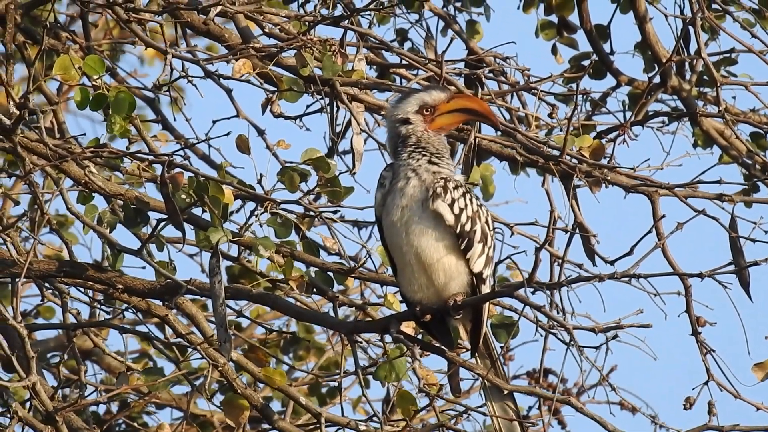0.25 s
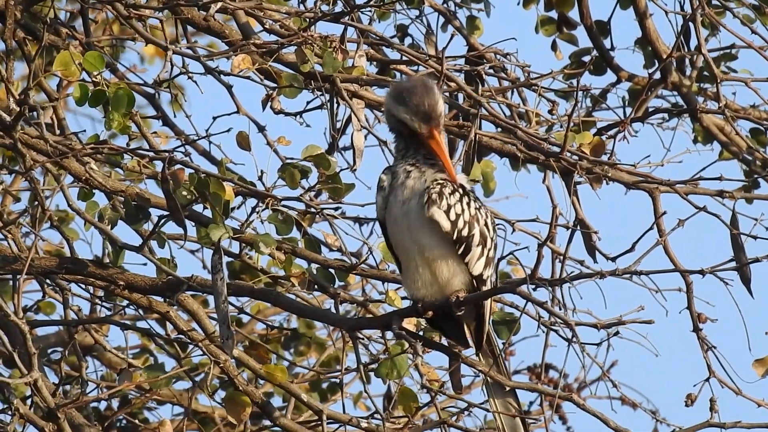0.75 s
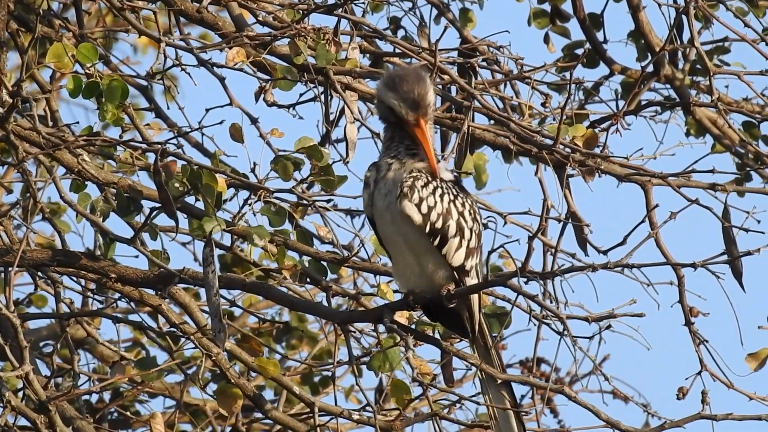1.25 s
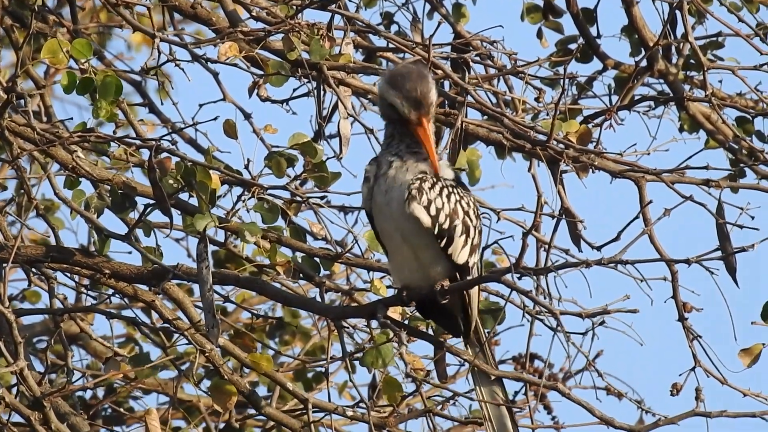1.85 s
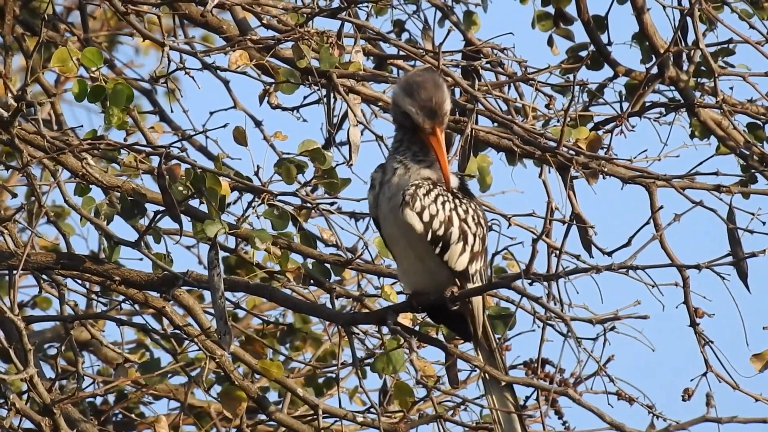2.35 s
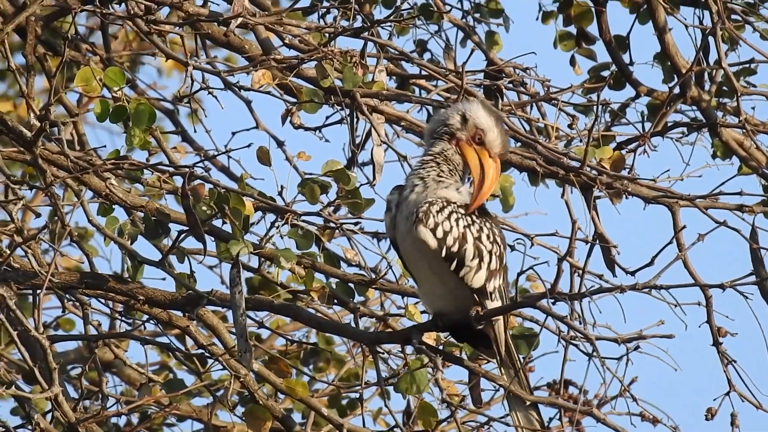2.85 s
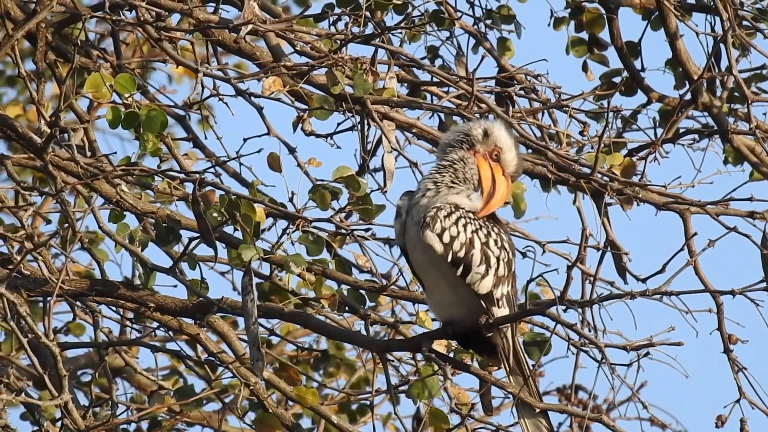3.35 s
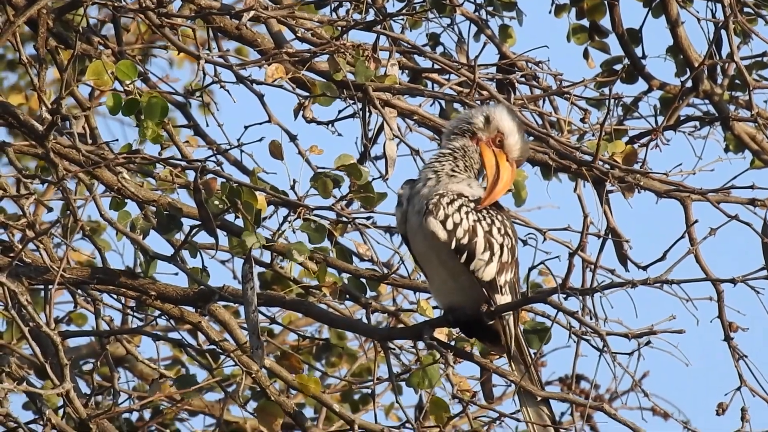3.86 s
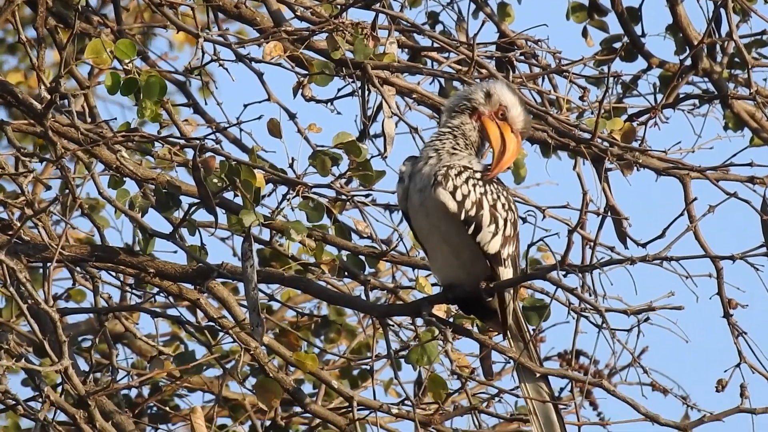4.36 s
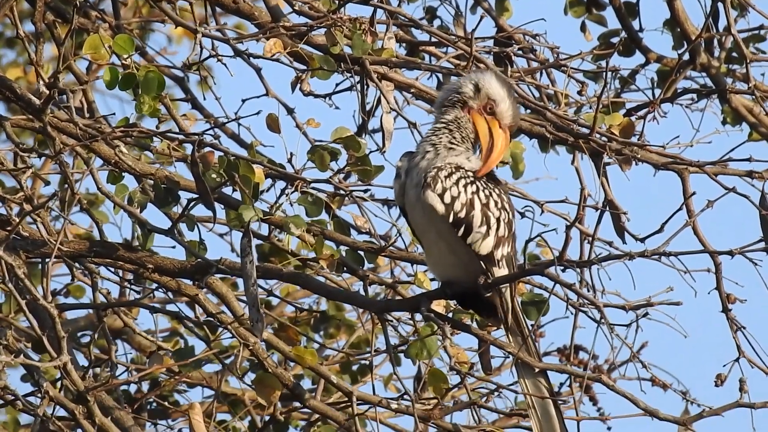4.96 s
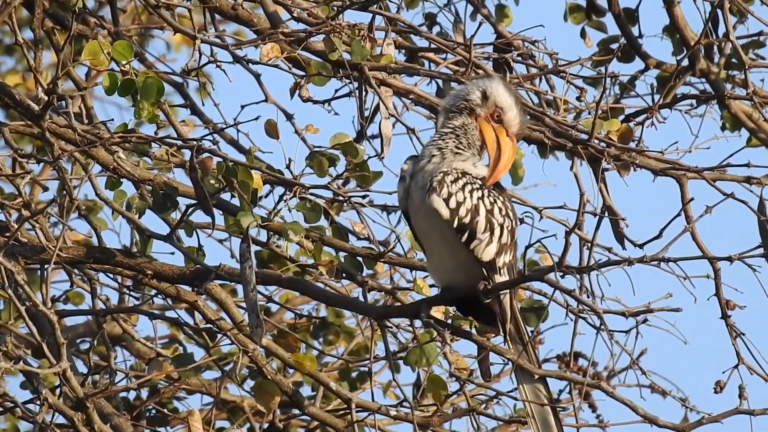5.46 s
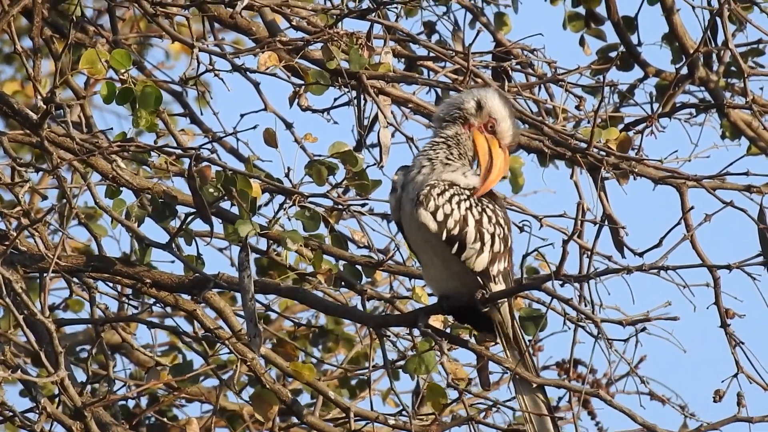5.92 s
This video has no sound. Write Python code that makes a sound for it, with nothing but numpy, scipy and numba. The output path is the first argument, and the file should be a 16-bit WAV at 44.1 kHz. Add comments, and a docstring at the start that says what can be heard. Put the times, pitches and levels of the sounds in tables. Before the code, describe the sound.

A hornbill repeats short falling calls outdoors over low rumble and hiss, with a distant dove cooing and one sharp click.

```python
"""From the start, over a stereo microphone's rumble and hiss, a hornbill in a thorn tree repeats a short
falling 'wok' about five times a second: harmonics shaped by its throat, echoed by branches, trunks and
ground, and rounded off by the microphone when loudest. From 0.5 s leaves rustle and small birds chirp
faintly, as narrow bands of noise. At 1.4 s a distant dove begins to repeat a nearly pure three-note
phrase, its long note modulated into a roll. At 3.7 s something gives one sharp click; the birds call on."""
import sys
import numpy as np
from scipy import signal
from scipy.fft import rfft, irfft
from scipy.io import wavfile
from numba import njit

SR = 44100
rng = np.random.default_rng(int(sys.argv[2]) if len(sys.argv) > 2 else 0)


def to_wav(sig):
    """Store sig (one row per channel, or 1-D mono) as 16-bit WAV at the path in sys.argv[1].

    Samples outside -1..1 are clipped; the rate is SR.
    """
    pcm = np.clip(np.atleast_2d(sig), -1, 1) * 32767
    pcm = np.round(pcm).astype(np.int16)
    wavfile.write(sys.argv[1], SR, pcm.T)  # frames by channels


N = 272979

# hornbill calls: (time of peak [s], vocal effort [dB])
CALLS = [(0.1109, -0.3), (.2723, -3), (.472, -0.3), (0.671, 1), (.868, 0.2), (1.0757, -1), (1.2773, -1.7),
         (1.4439, 0.34), (1.6553, 1.5), (1.8643, -0.8), (2.0329, 1.6), (2.2289, 2), (2.3908, 0.95),
         (2.5664, 3.5), (2.7533, 1.5), (2.9142, 4), (3.098, 2.7), (3.3757, 5), (3.5569, 5), (3.7841, 4),
         (3.9699, 3), (4.157, 2.5), (4.4236, 0.0867), (4.8041, 2), (5.0351, 0.86), (5.251, 0.9),
         (5.4526, 2.5), (5.6395, 2.5), (5.8361, 4), (6.0266, 3), (6.1896, 1.5)]
# course of a call: (position [0-1], pitch [ratio], first partial [gain], second partial [gain])
CALL_CONTOUR = [(0, 1.386, 0.033, 0.0092), (.098, 1.33, 0.032, 0), (0.17, 1.225, 0.15, 0.012),
                (0.26, 1.018, 0.068, .2), (0.431, 1.018, .15, 0.42), (0.622, 0.978, .11, 0.32),
                (0.73, 0.937, 0.086, 0.36), (.866, 0.804, 0.04, 0.13), (1, 0.714, 0.0064, 0.081)]
# throat response for the upper partials: (frequency [Hz], level re first partial [dB])
THROAT_RESPONSE = [(1200, 11.5), (1380, -31), (1600, -19.5), (1900, -49), (2200, -21), (2600, -37.5),
                   (3400, -30)]


def hornbill(base_hz=521.15, sharp_hz=15.1, settle_s=0.6, hz_per_db=3, spread_hz=2.52, jitter=0.0092):
    """Source and filter: the throat favours the second harmonic of a voice that drops, holds and drops."""
    out = np.zeros(N)
    position, pitch_ratios, *partial_gains = np.transpose(CALL_CONTOUR)
    for peak_s, effort_db in CALLS:
        # the first calls are a little sharp; effort also raises the pitch
        call_hz = base_hz + sharp_hz * np.exp(-peak_s / settle_s) + hz_per_db * effort_db
        call_hz += spread_hz * rng.standard_normal()
        # only the hardest calls are drawn out and hold their pitch longer
        strain = np.exp((effort_db - 5.5) / 1.15)
        length_s = 0.0373 + 0.0097 * strain
        progress = np.linspace(0, 1, int(length_s * SR))
        bend = np.interp(progress - 0.14 * strain * progress ** 3, position, pitch_ratios)
        pitch_hz = call_hz * bend * (1 + jitter * wander(398, len(progress)))
        phase = 2 * np.pi * np.cumsum(pitch_hz) / SR
        first, second = (np.interp(progress, position, gain) for gain in partial_gains)
        tone = first * np.sin(phase) + second * np.sin(2 * phase + np.pi / 4)
        # the third partial slides into the throat resonance as the call ends
        for k in range(3, 7):
            throat = undb(np.interp(k * pitch_hz, *np.transpose(THROAT_RESPONSE)))
            tone += first * throat * np.sin(k * phase)
        # the voice breaks up as it falls
        noise = unit_rms(band(rng.standard_normal(len(progress)), hz=1280, width_hz=300))
        rasp = undb(-20) * second * bump(progress, centre=0.76, width=0.059) * noise
        # effort goes mostly into the peak of the call
        accent = undb(effort_db * (0.2 + 0.6 * bump(progress, centre=0.6, width=0.12)))
        add(out, peak_s - 0.6 * length_s, accent * (tone + rasp))
    return out


# returns from ground, trunks and thickets: (delay [s], level [dB], lag of the left channel [s])
REFLECTIONS = [(.01319, -9, -.00006), (.01442, -6, 0.0028), (.03111, -1, -.00054), (.05025, -11.5, .00039),
               (.06881, -14.5, .00027), (.0934, -20, -.00031)]


def with_reflections(direct):
    """Interference: delayed reflections add to the direct sound and beat against its falling pitch."""
    return direct + sum(undb(db) * arrive(direct, delay_s, lag_s) for delay_s, db, lag_s in REFLECTIONS)


# dove phrases: (start [s], level [dB])
DOVE_PHRASES = [(1.371, -18), (2.595, -17.5), (3.855, -15.5), (5.08, -15.5)]
# lead-in, long roll and short close: (start in phrase [s], length [s], first pitch [Hz],
# middle pitch [Hz], last pitch [Hz], level re phrase [dB], roll depth [0-1])
DOVE_NOTES = [(0, .09, 730, 942, 705, -2.5, 0.13), (0.459, .375, 862, 836, 790, 2, 0.85),
              (.93, .045, 690, 799.6, 755, -8.5, .05)]


def dove(roll_hz=33, roll_sweep=0.16, waver=0.036, edge_s=0.0083):
    """Amplitude and frequency modulation: a roll chops arched, nearly pure notes into falling pulses."""
    out = np.zeros(N)
    for start_s, phrase_db in DOVE_PHRASES:
        for offset_s, length_s, first_hz, middle_hz, last_hz, note_db, depth in DOVE_NOTES:
            t = np.arange(int(length_s * SR)) / SR
            parabola = np.polyfit([0, length_s / 2, length_s], [first_hz, middle_hz, last_hz], 2)
            cycle = (roll_hz * t + 0.18 * wander(9, len(t))) % 1
            slide = depth * roll_sweep * (1 - 2 * cycle)
            pitch_hz = np.polyval(parabola, t) * (1 + slide + waver * wander(118.8, len(t)))
            tone = np.sin(2 * np.pi * np.cumsum(pitch_hz) / SR)
            pulses = 1 - depth + depth * np.sin(np.pi * cycle) ** 3.1
            edges = np.clip(np.minimum(t, length_s - t) / edge_s, 0, 1)
            gain = undb(phrase_db + note_db + wander(23.4, len(t)))
            add(out, start_s + offset_s, gain * edges * pulses * tone)
    return out


def bush_scatter(x, t60_s=1.0, onset_s=0.0091):
    """Diffuse scattering: twigs and trees return a decaying tail, uncorrelated between the channels."""
    t = np.arange(SR * 3 // 4) / SR
    response = rng.standard_normal((2, len(t))) * (1 - np.exp(-t / onset_s)) * decay(t, t60_s)
    response /= np.sqrt(np.sum(response ** 2) / 2)
    return signal.fftconvolve(x[None], response, axes=1)[:, :N]


# a crack and two quick after-blows: (time [s], level [dB], low-pass corner [Hz])
CLICK_BLOWS = [(3.6557, -12.5, 8800), (3.6626, -18.5, 6000), (3.670, -13, 1000)]
# resonances of the click: (frequency [Hz], relative level [dB], 60 dB decay time [s])
CLICK_MODES = [(370, -9, .14), (640, -12, .1), (1220, -13, .1), (1460, -12, .1), (1960, -9, .11),
               (2370, -14, .12), (2850, -16, .06), (3750, -7, .045), (6770, -14, .15)]
# spectrum of its noise: (frequency [Hz], relative level [dB])
CLICK_SPECTRUM = [(300, -1), (1000, 2), (2000, -4), (3700, -1.5), (5000, -9.5), (7000, -5), (10000, -13),
                  (12000, -13), (15500, -24)]


def click(crack_t60_s=0.095, tail_t60_s=0.26, tail_db=-6, tail_hz=5500, low_cut_hz=240):
    """Impact excitation: each blow gives a broadband crack, a duller tail and a set of damped modes."""
    out = np.zeros((2, N))
    t = np.arange(SR // 4) / SR
    for start_s, db, corner_hz in CLICK_BLOWS:
        crack_noise, tail_noise = unit_rms(colour(rng.standard_normal((2, 2, len(t))), CLICK_SPECTRUM))
        crack = crack_noise * decay(t, crack_t60_s)
        tail = undb(tail_db) * lowpass(tail_noise, tail_hz) * decay(t, tail_t60_s)
        ring = sum(undb(mode_db) * decay(t, t60_s) * np.sin(2 * np.pi * (hz * t + rng.random((2, 1))))
                   for hz, mode_db, t60_s in CLICK_MODES)
        add(out, start_s, undb(db) * lowpass(crack + tail + ring, corner_hz))
    return signal.sosfilt(signal.butter(2, low_cut_hz, "high", fs=SR, output="sos"), out)


# faint rustles and chirps: (start [s], length [s], centre [Hz], bandwidth [Hz], level [dB])
FOLIAGE_SOUNDS = [(0.539, 0.037, 5470, 900, -42), (0.638, 0.062, 6550, 2000, -42),
                  (.89, 0.057, 7300, 1500, -48.5), (2.755, .04, 6200, 900, -38.5),
                  (4.187, 0.092, 4730, 1000, -40), (4.543, 0.088, 1550, 800, -35),
                  (4.548, 0.087, 4570, 1200, -43), (5.356, 0.1, 1580, 790, -33),
                  (5.365, 0.09, 4500, 2000, -42.5), (5.653, .012, 2730, 1400, -33)]


def foliage():
    """Narrow-band noise: leaves and small birds sound as short, soft swells with a vague pitch."""
    out = np.zeros((2, N))
    for start_s, length_s, hz, width_hz, db in FOLIAGE_SOUNDS:
        window = np.hanning(int(length_s * SR))
        noise = unit_rms(band(rng.standard_normal((2, len(window))), hz, width_hz))
        add(out, start_s, undb(db) * window * noise)
    return out


# steady rumble and hiss: (frequency [Hz], relative spectral density [dB])
NOISE_SPECTRUM = [(20, -17), (35, -9), (60, 3.5), (100, -1), (200, -7.5), (400, -9), (800, -14),
                  (1300, -23), (2200, -27.5), (4000, -30.5), (7000, -31), (10000, -35), (16000, -40.5)]
# their stereo width: (frequency [Hz], side level re mid [dB])
NOISE_WIDTH = [(60, -19), (120, -16.5), (200, -9.5), (380, -6.5), (700, 6), (1300, 1.5), (2400, 0.5),
               (15000, 0)]


def rumble_and_hiss(level_db=-30.5, sway_db=0.27):
    """Coherence sets width: the channels share the low rumble but differ in the hiss, which sounds wide."""
    mid, side = rng.standard_normal((2, N))
    side = colour(side, NOISE_WIDTH)
    noise = unit_rms(colour(np.array([mid + side, mid - side]), NOISE_SPECTRUM))
    return noise * undb(level_db + sway_db * wander(2.86, N))


def undb(db):
    return 10 ** (np.asarray(db) / 20)


def unit_rms(x):
    return x / np.sqrt(np.mean(x ** 2))


def decay(t, t60_s):
    return np.exp(-np.log(1000) * t / t60_s)


def bump(x, centre, width):
    return np.exp(-((x - centre) / width) ** 2)


def lowpass(x, hz):
    return signal.lfilter(*signal.butter(1, hz, fs=SR), x)


def band(x, hz, width_hz):
    edges = [hz - width_hz / 2, hz + width_hz / 2]
    return signal.sosfilt(signal.butter(2, edges, "band", fs=SR, output="sos"), x)


def colour(x, points):
    """Spectral shaping by a curve of (frequency [Hz], gain [dB]) points."""
    hz, db = np.transpose(points)
    bins_hz = np.fft.rfftfreq(x.shape[-1], 1 / SR)
    gain = undb(np.interp(np.log(bins_hz + 1), np.log(hz), db))
    return irfft(rfft(x) * gain, x.shape[-1])


def wander(rate_hz, size):
    """Interpolated Gaussian noise with a spread near 1."""
    knots = rng.standard_normal(int(size / SR * rate_hz) + 2)
    return np.interp(np.arange(size) / SR * rate_hz, np.arange(len(knots)), knots)


def add(track, start_s, x):
    """Superposition of x on the track from start_s on."""
    i = int(start_s * SR)
    track[..., i:i + x.shape[-1]] += x[..., :max(N - i, 0)]


def arrive(x, delay_s, lag_s):
    """Path difference: a delayed sound from one side reaches the two channels at different times."""
    t = np.arange(N) / SR
    return np.array([np.interp(t - delay_s - side * lag_s / 2, t, x, left=0) for side in (1, -1)])


@njit
def follow(x, attack, release):
    """Envelope detection: one-pole smoothing with separate rates of rise and fall."""
    out, level = np.empty(len(x)), 0.
    for i in range(len(x)):
        level += (x[i] - level) * (attack if x[i] > level else release)
        out[i] = level
    return out


def scene(call_scatter_db=-18, dove_scatter_db=-7, left_over_right_db=0.5):
    """Superposition: both birds, their echoes, the click and the foliage add to the steady noise."""
    calls, coos = hornbill(), dove()
    scatter = bush_scatter(undb(call_scatter_db) * calls + undb(dove_scatter_db) * coos)
    birds = with_reflections(calls) + arrive(coos, delay_s=0, lag_s=0.00049) + scatter
    balance = undb([[left_over_right_db / 2], [-left_over_right_db / 2]])
    return balance * (birds + click() + foliage()) + rumble_and_hiss()


def record(dry, threshold=0.41, attack_s=0.011, release_s=0.067, ceiling=0.54, knee=15, top_hz=15850):
    """Saturation: peaks too fast for the limiter flatten with a brief buzz; a low-pass cuts the top."""
    level = follow(np.abs(dry).max(axis=0), 1 / (attack_s * SR), 1 / (release_s * SR))
    limited = dry / np.maximum(level / threshold, 1)
    rounded = limited / (1 + np.abs(limited / ceiling) ** knee) ** (1 / knee)
    return signal.sosfilt(signal.ellip(10, .1, 70, top_hz, fs=SR, output="sos"), rounded)


dry = scene()
out = record(dry)
to_wav(out)
```